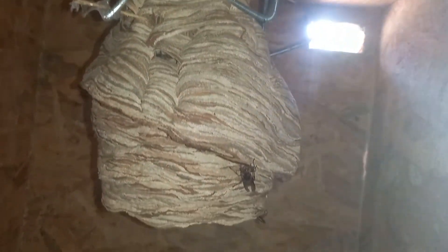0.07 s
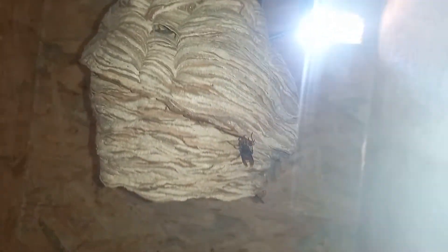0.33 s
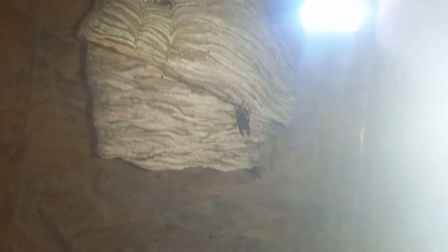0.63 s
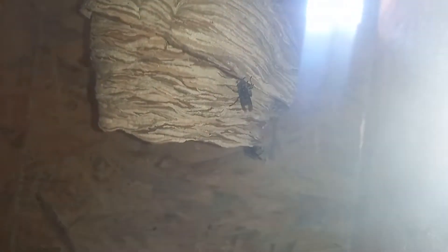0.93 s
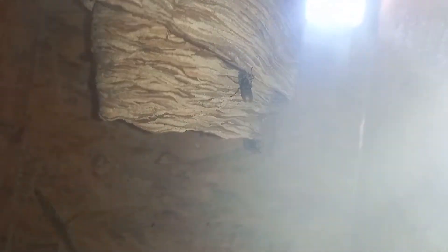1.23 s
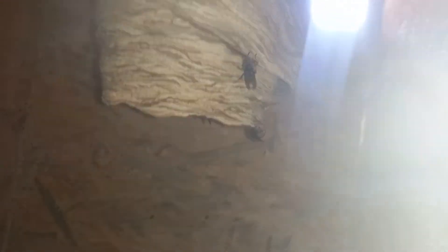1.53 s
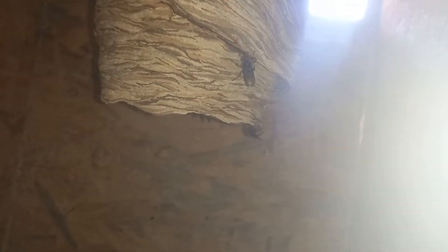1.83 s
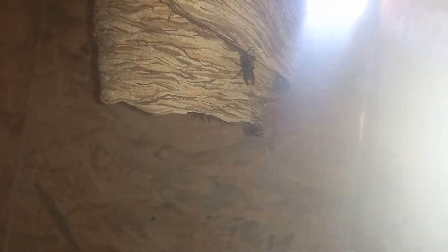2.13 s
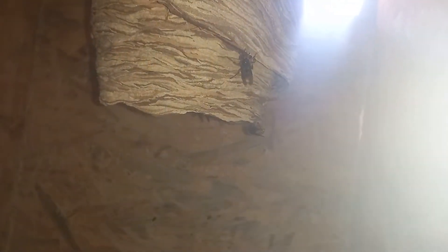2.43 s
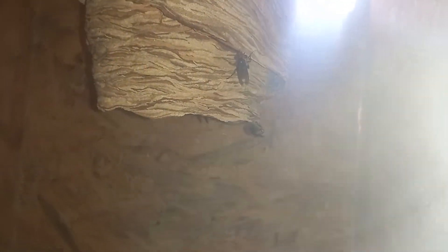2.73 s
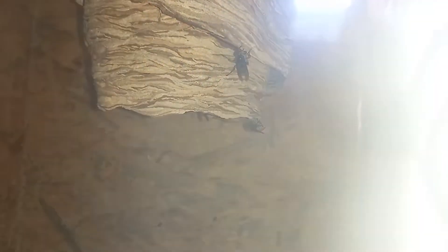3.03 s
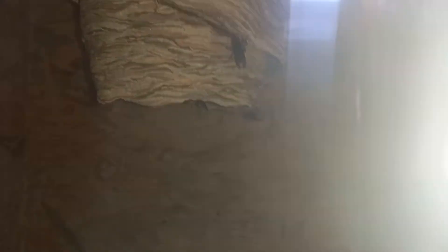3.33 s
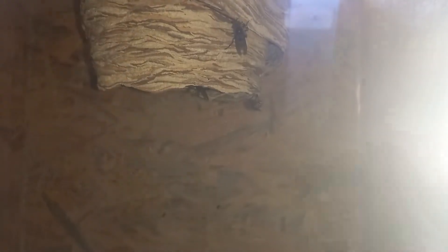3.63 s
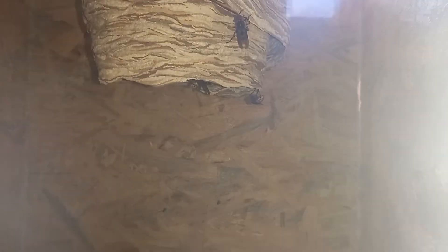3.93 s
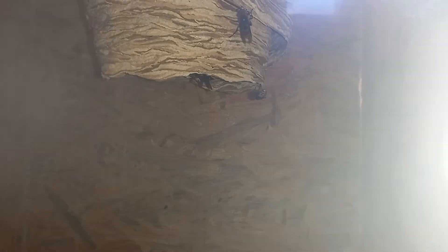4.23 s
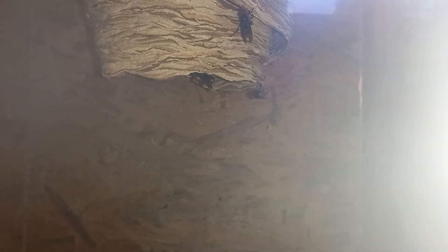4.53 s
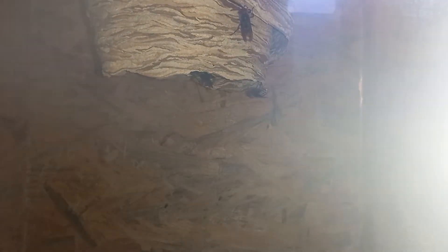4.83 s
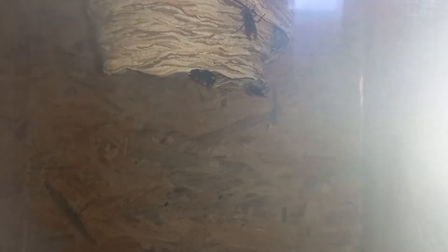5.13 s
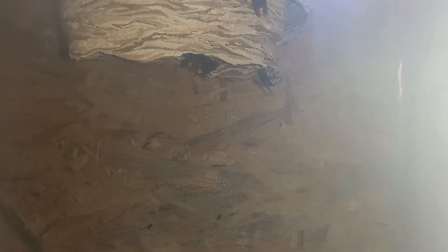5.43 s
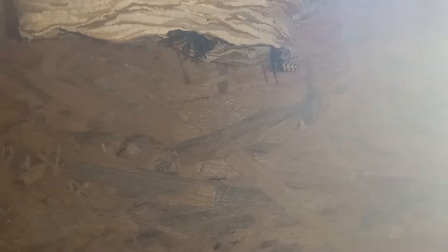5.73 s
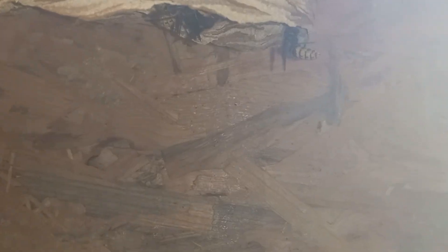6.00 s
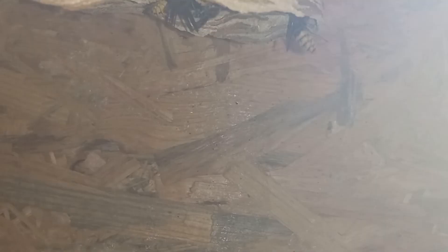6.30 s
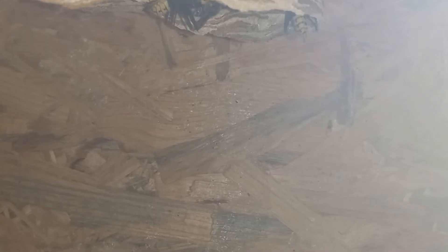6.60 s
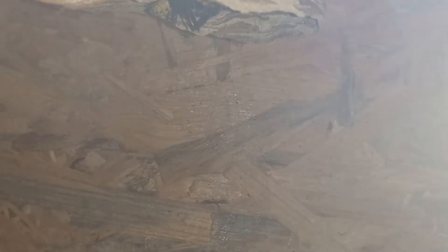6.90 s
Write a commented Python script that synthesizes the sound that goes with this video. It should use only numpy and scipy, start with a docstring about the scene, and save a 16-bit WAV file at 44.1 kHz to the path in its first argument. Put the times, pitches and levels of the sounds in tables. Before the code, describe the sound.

Inside a wooden box, close to a hornets' nest, a quiet low rumble and hum sit under a thin hiss. For the first four seconds or so, the microphone is shifted about, making scratchy rustles, brief rips and a few dull, booming bumps. Then it lies almost still, leaving tiny clicks and faint, papery crackling as a hornet chews the nest.

```python
"""Inside a wooden box, close to a hornets' nest. Dry rubbing and tearing, made of tiny fibre slips,
pass right by two microphone ports in a small casing. The casing bumps the box a few times and both ring.
After about 4 s it lies almost still: jaws tick and rasp faintly on the nest paper,
over a steady low hum, the rumble of the box and a thin hiss."""
import sys
import numpy as np
from scipy import signal
from scipy.fft import rfft, irfft
from scipy.io import wavfile
from scipy.ndimage import uniform_filter1d

SR = 44100
rng = np.random.default_rng(int(sys.argv[2]) if len(sys.argv) > 2 else 0)


def to_wav(sig):
    """Store sig (one row per channel, or 1-D mono) as 16-bit WAV at the path in sys.argv[1].

    Samples outside -1..1 are clipped; the rate is SR.
    """
    pcm = np.clip(np.atleast_2d(sig), -1, 1) * 32767
    pcm = np.round(pcm).astype(np.int16)
    wavfile.write(sys.argv[1], SR, pcm.T)  # frames by channels


N = 306936
TIME_S, BINS_HZ = np.arange(N) / SR, np.fft.rfftfreq(N, 1 / SR)


def amp(db):
    """Decibels to gain."""
    return 10 ** (np.asarray(db) / 20)


def unit(x):
    """Scale to rms 1."""
    return x / np.sqrt(np.mean(x ** 2) + 1e-20)


def curve_at(points, hz):
    """Interpolate on a log-frequency axis."""
    point_hz, value = np.transpose(points)
    return np.interp(np.log(hz + 1), np.log(point_hz + 1), value)


def ports(pan_db):
    """Constant-power stereo gains; pan is left minus right."""
    gains = amp(np.array([[.5], [-.5]]) * pan_db)
    return gains / np.sqrt(np.mean(gains ** 2, 0))


def colour(x, spectrum, tilt_db_oct=0):
    """Apply a spectrum, tilted above 1 kHz; rms 1."""
    hz = np.fft.rfftfreq(x.shape[-1], 1 / SR)
    octaves = np.log2(np.maximum(hz, 1000) / 6000)
    gain = amp(curve_at(spectrum, hz) + tilt_db_oct * octaves)
    return unit(irfft(rfft(x) * gain, x.shape[-1]))


def wander(hz, channels=1):
    """Random drift up to a rate; rms 1."""
    return unit(irfft(rfft(rng.standard_normal((channels, N))) / (1 + (BINS_HZ / hz) ** 4), N))


def add(mix, at_s, sound):
    """Mix in a stereo sound."""
    part = mix[:, max(round(at_s * SR), 0):][:, :sound.shape[1]]
    part += sound[:, :part.shape[1]]


def slips(per_s, spread_db, bed_rms):
    """Tiny slips of uneven size over a bed of finer ones, separate at each port."""
    size = amp(spread_db * np.minimum(rng.exponential(1, (2, N)), 4))
    impulses = size * rng.choice([-1, 1], (2, N)) * (rng.random((2, N)) < per_s / SR)
    return unit(impulses) + bed_rms * rng.standard_normal((2, N))


def swells(peaks_s, rises_s, falls_s, levels_db, pans_db, drop_db=9, flatness=1.82):
    """Stereo envelope of strokes, each drop_db down one rise before and one fall after its peak."""
    power = np.zeros((2, N))
    for peak_s, rise_s, fall_s, db, pan_db in np.broadcast(peaks_s, rises_s, falls_s, levels_db, pans_db):
        t = np.arange(-min(2 * rise_s, peak_s), 2 * fall_s, 1 / SR)
        from_peak = np.maximum(-t / rise_s, t / fall_s)
        gain = amp(db - drop_db * from_peak ** flatness) * ports(pan_db)
        add(power, peak_s + t[0], gain ** 2)
    return np.sqrt(power)


def resonate(x, hz, width_hz):
    """Steep resonance that can slide; rms 1."""
    carrier = np.exp(2j * np.pi * np.cumsum(hz * np.ones(x.shape[1])) / SR)
    pole = np.exp(-np.pi * width_hz / SR)
    baseband = signal.lfilter([1], np.poly([pole, pole]), x / carrier)
    return unit((carrier * baseband).real)


def struck(modes, t, weight_db=0):
    """Decaying modes, peak 1; every blow lands on a slightly different spot."""
    hz, db, t60_s = np.transpose(modes)[:, :, None]
    hz = hz * (1 + .015 * rng.standard_normal(hz.shape))
    sign = (-1) ** np.arange(len(hz))[:, None]
    ring = (sign * amp(db + weight_db - 60 * t / t60_s) * np.sin(2 * np.pi * hz * t)).sum(0)
    return ring / abs(ring).max()


# Fibre friction (frequency [Hz], level [dB])
RUB_SPECTRUM = [(710, -5.5), (1200, -4), (1660, -4.5), (1850, -5.5), (2350, -5), (2730, -3), (4450, -3),
                (6720, -4), (9610, -1.5), (11100, -4), (12200, -2.5), (15200, -6), (16000, -17.5)]
# Rubbing strokes (peak time [s], rise [s], fall [s], hiss level [dB], hiss pan [dB],
# body level [dB], body pan [dB], hiss tilt [dB/oct])
STROKES = [(0.03, 0.12, 0.16, -53.5, 2.5, -70, -3, 1.5), (0.136, 0.073, 0.05, -45.5, -6, -62.5, -16, -1),
           (0.22, 0.026, .11, -44.5, 3.5, -60, 3, 1.5), (0.37, 0.06, 0.18, -51.5, 1.5, -60, 0, -1.5),
           (0.466, 0.026, 0.017, -43.5, 6, -58, 14, 1.5), (0.55, 0.088, 0.15, -50.5, 2, -66, 4, -0.5),
           (0.614, 0.024, 0.066, -47, -9, -41.5, -19, -4), (0.68, 0.065, 0.036, -40.5, 2, -41.5, 1, 0),
           (0.745, 0.069, 0.069, -45, 3, -42.5, 3, -3), (0.853, 0.045, 0.039, -45, 4.5, -51, 10, -1),
           (0.98, 0.092, 0.087, -53.5, 5, -62, 0, -1), (1.063, 0.048, 0.052, -53, 8, -47.5, 5, -1.5),
           (1.2, 0.14, 0.1, -55.5, 2.5, -53.5, 0, 0), (1.37, 0.087, 0.082, -56.5, 8, -57.5, 0, 1),
           (1.438, 0.061, .04, -49.5, 0, -51.5, 1, -2.5), (1.575, 0.053, 0.04, -54, 1.5, -52.5, 2, 1.5),
           (1.628, 0.024, .045, -53, -3.5, -42, -4, -3.5), (1.8, 0.31, 0.1, -70, -3, -70, -1, 4),
           (1.98, 0.066, 0.061, -62, 9, -57, 7, 3), (2.08, 0.044, 0.025, -59.5, 19, -56.5, 21, -1),
           (2.134, 0.029, 0.043, -56, -0.5, -48.5, 3.5, 1.5), (2.275, 0.098, 0.098, -61, 4.5, -53, 9, 0.5),
           (2.465, 0.031, .04, -67, 8, -59.5, 13, 2), (2.53, 0.019, 0.05, -57, 23, -50.5, 24, -1),
           (2.569, .025, 0.034, -58.5, 1, -49.5, 6, -3), (2.705, 0.034, 0.076, -58, -2, -56, 21, -1),
           (2.787, 0.039, 0.033, -52, 2.5, -48, 5, -2.5), (2.889, 0.037, 0.049, -64, 14, -54, 13, 2),
           (3.015, 0.044, 0.052, -53, 19, -52, 6, -2.5), (3.11, 0.12, 0.058, -54.5, 4.5, -54.5, 7, -4),
           (3.27, 0.035, .035, -52, -2, -53.5, 20, -1), (3.335, 0.038, 0.043, -46, -0.5, -48, 20, 0),
           (3.39, .04, 0.027, -52.5, 1.5, -47.5, 9, -2), (3.455, 0.047, 0.036, -56.5, 5, -51, 3.5, -2.5),
           (3.53, 0.052, 0.036, -54.5, -7, -60, -2, -3.5), (3.62, 0.17, 0.092, -69.5, 1, -65.5, 0.5, 4.5),
           (3.76, 0.033, 0.14, -78.5, -1, -71.5, -1, 3), (3.895, 0.047, 0.042, -68.5, 1, -67.5, 0, 0.5),
           (3.945, 0.024, 0.073, -81, 2, -69, -1, 2.5), (4.085, 0.046, 0.048, -61.5, 4.5, -60.5, 13, 1),
           (4.142, 0.03, 0.034, -58.5, -8.5, -68, -5, -0.5), (4.27, 0.11, 0.062, -79.5, 3, -73, 0, 0.5)]


def rubbing(firm_db=-53.5, patch_db=3.07):
    """Dense fibre slips; the contact shifts, so patches of the spectrum come and go."""
    peak_s, rise_s, fall_s, db, pan_db, _, _, tilt_db_oct = np.transpose(STROKES)
    friction = colour(slips(per_s=2500, spread_db=3, bed_rms=1), RUB_SPECTRUM)
    hz, frame_s, frames = signal.stft(friction, SR, nperseg=512)
    patches = uniform_filter1d(rng.standard_normal(frames.shape), size=9, axis=1)
    patches = unit(uniform_filter1d(patches, size=12, axis=2))
    octaves = np.log2(np.maximum(hz, 1000) / 7000)[:, None]
    tilt_db = octaves * np.interp(frame_s, peak_s, tilt_db_oct)
    fizz_band = np.clip((hz[:, None] - 10000) / 3500, 0, 1)
    contact_db = np.clip(0.96 * (db - firm_db), -11, 1)  # light contact loses fizz
    fizz_db = fizz_band * np.interp(frame_s, peak_s, contact_db)
    frames = frames * amp(patch_db * patches + tilt_db + fizz_db)
    friction = unit(signal.istft(frames, SR, nperseg=512)[1][:, :N])
    flutter_db = 1.4 * wander(hz=49.4, channels=2)
    return friction * swells(peak_s, rise_s, fall_s, db, pan_db) * amp(flutter_db)


# Friction through the casing (frequency [Hz], level [dB])
DRAG_SPECTRUM = [(53, -26), (90, -3.5), (145, 0), (174, -13), (231, -2.5), (274, -7), (530, -6.5),
                 (1340, -18), (1500, -21), (1750, -23.5), (2600, -38), (3380, -54.5), (5720, -120)]


def dragging():
    """Coarser slips of the same strokes sound through the casing."""
    peak_s, rise_s, fall_s, _, _, db, pan_db, _ = np.transpose(STROKES)
    body = colour(slips(per_s=1200, spread_db=1.5, bed_rms=0.85), DRAG_SPECTRUM)
    flutter_db = 1.5 * wander(hz=30, channels=2)
    return body * swells(peak_s, rise_s, fall_s, db, pan_db) * amp(flutter_db)


# Box and casing modes (frequency [Hz], level [dB], t60 [s])
BOX_MODES = [(70, 1, .13), (138, 0, .15), (232, -4, .1), (322, -6, .08), (410, -5, .07), (510, -6, .05),
             (650, -10, .04), (900, -8, .04)]
CASING_MODES = [(498, 9, 0.031), (946, 3, 0.017), (2090, 2.5, 0.0028), (4000, -12.5, .003)]
# Blows on the box (time [s], boom level [dB], centre [Hz], pan [dB], crack level [dB])
BUMPS = [(0.674, -17, 337, 10, -34), (0.6889, -16.5, 113, 11, -32), (1.146, -37.5, 170, 16, -40),
         (1.390, -25.5, 217, 11, -25), (1.4018, -26.5, 106, 2.5, -50), (1.442, -35, 169, 2, -39.5),
         (1.597, -21, 237, 8, -20.5), (1.6092, -24.5, 103, 5.5, -49), (2.523, -47, 171, 6, -33.5),
         (2.602, -45, 500, 6, -43.5), (2.678, -30.5, 290, 28, -43), (3.4397, -27, 262, 10, -34),
         (3.444, -23.5, 138, 3, -55), (3.921, -38.5, 318, 7, -68), (4.1432, -36.5, 250, 31, -40.5),
         (4.169, -33, 86.8, -3.5, -70.5), (6.103, -46, 289, -10, -72)]


def bumps(right_lag_s=.001, focus_db=4.5):
    """The casing cracks and the box booms around the blow's centre frequency, later on the right."""
    out, t = np.zeros((2, N)), np.arange(SR // 3) / SR
    for at_s, boom_db, centre_hz, pan_db, crack_db in BUMPS:
        octaves = np.log2(np.array(BOX_MODES)[:, :1] / centre_hz)
        for port, arrival_s in zip(np.eye(2), (at_s, at_s + right_lag_s)):
            boom = amp(boom_db) * struck(BOX_MODES, t, -focus_db * octaves ** 2)
            crack = amp(crack_db) * struck(CASING_MODES, t)
            add(out, arrival_s, (boom + crack) * ports(pan_db) * port[:, None])
    return out


# Short tears (time [s], level [dB], t60 [s], pan [dB], tilt [dB/oct])
TEARS = [(0.181, -32.5, 0.062, 5, 0.5), (0.1908, -35, 0.084, 8, -1), (0.2213, -35, 0.036, -2, -3.5),
         (0.251, -38.5, 0.07, -8, -0.5), (0.4233, -33.5, 0.031, -6, 4), (0.6778, -30, 0.034, 6, -2),
         (0.7594, -35.5, 0.061, -1, -2.5), (0.8238, -33.5, 0.031, 11, -2), (1.419, -42.5, .05, 0, -5.5),
         (1.598, -30.5, 0.021, 3, -9.5), (1.715, -57.5, 0.06, -9, 0.5), (2.5236, -61, 0.07, 20, -4),
         (3.235, -56.5, 0.062, 11, -5), (3.3158, -34.5, 0.058, -10, -2), (3.5197, -43, 0.081, -19, -6)]


def tears(attack_s=0.00041):
    """A catch lets go in a burst of slips that dies quickly."""
    out, t = np.zeros((2, N)), np.arange(SR // 6) / SR
    for at_s, db, t60_s, pan_db, tilt_db_oct in TEARS:
        burst = colour(rng.standard_normal((2, len(t))), RUB_SPECTRUM, tilt_db_oct)
        envelope = (1 - np.exp(-t / attack_s)) * amp(db - 60 * t / t60_s)
        add(out, at_s, burst * envelope * ports(pan_db))
    return out


# Stick-slip strokes (peak time [s], rise [s], fall [s], level [dB], resonance [Hz])
CHAFES = [(0.31, 0.052, 0.12, -54, 1300), (0.47, 0.12, 0.083, -56, 1160),
          (0.592, 0.0081, 0.026, -37.5, 1020), (0.667, 0.038, 0.034, -40.5, 1150),
          (0.87, .04, 0.048, -55.5, 930)]


def chafing():
    """Slips ring one sliding resonance, mostly on the right."""
    peak_s, rise_s, fall_s, db, hz = np.transpose(CHAFES)
    friction = slips(per_s=600, spread_db=6.5, bed_rms=0.97)
    ring = resonate(friction, np.interp(TIME_S, peak_s, hz), width_hz=570)
    return ring * swells(peak_s, rise_s, fall_s, db, pans_db=-27)


# Squeaks and groans (time [s], length [s], level [dB], resonance [Hz], width [Hz], pan [dB])
SQUEAKS = [(2.045, 0.41, -69.5, 4550, 1500, 19), (2.435, 0.085, -69, 1400, 300, -13),
           (2.52, 0.12, -59.5, 1510, 700, 4), (2.521, 0.085, -68, 5100, 600, 4),
           (2.676, 0.17, -65.5, 5000, 600, -18), (2.736, 0.061, -57.5, 1510, 200, -22),
           (3.314, 0.02, -45, 2240, 300, -14), (3.316, .11, -54, 1320, 900, -4),
           (3.512, 0.04, -53.5, 1360, 500, -17), (4.146, .06, -52.5, 324, 300, -1),
           (4.457, 0.19, -84, 9500, 2000, 17), (5.018, 0.11, -84, 2130, 150, -6),
           (5.028, .1, -82, 5730, 400, -12), (6.085, .12, -64, 330, 45.5, -6),
           (6.089, .13, -64.5, 470, 200, -6), (6.096, .05, -80, 14100, 2000, -3),
           (6.109, 0.27, -83, 7600, 2200, -18)]


def squeaks():
    """Friction briefly locks onto one resonance, then lets go."""
    out = np.zeros((2, N))
    for at_s, length_s, db, hz, width_hz, pan_db in SQUEAKS:
        progress = np.linspace(0, 1, round(length_s * SR))
        grip = np.minimum(progress / 0.12, 1) * (1 - progress ** 2)
        ring = resonate(rng.standard_normal((2, len(progress))), hz, width_hz)
        add(out, at_s, ring * grip * amp(db) * ports(pan_db))
    return out


# Fibre snap (frequency [Hz], level [dB])
TICK_SPECTRUM = [(800, -0.5), (2500, -2), (5000, -3), (9000, 3), (12000, -3.5), (15500, 1.5)]
# Jaw ticks (time [s], level [dB], pan [dB])
JAW_TICKS = [(0.421, -50, 13), (0.4823, -36.5, -11), (0.7205, -27.5, 10), (3.2152, -54, 3),
             (3.8267, -55, 1), (4.0112, -51.5, 4.5), (4.343, -51, 6), (4.373, -66, 10), (4.4394, -65, 1),
             (4.5205, -65, 10), (4.6815, -63, 3), (5.2594, -73, 3.0), (6.8796, -63, 1)]


def jaw_ticks(width_s=0.0012, tail_s=.007, tail_db=-25.5):
    """Jaws snap single fibres: a bright click with a slight tail."""
    out, t = np.zeros((2, N)), np.arange(SR // 20) / SR
    envelope = np.exp(-((t - .001) / width_s) ** 2) + amp(tail_db) * np.exp(-t / tail_s)
    for at_s, db, pan_db in JAW_TICKS:
        snap = colour(rng.standard_normal((2, len(t))), TICK_SPECTRUM)
        add(out, at_s, snap * envelope * amp(db) * ports(pan_db))
    return out


# Nest paper (frequency [Hz], level [dB])
PAPER_SPECTRUM = [(350, -22), (600, -6.5), (661, -0.5), (727, -6.5), (1160, -12), (1660, -12), (1930, -26),
                  (2120, -18), (2540, -18), (5190, -22), (9490, -17), (16000, -24)]
# Jaw strokes (peak time [s], rise [s], fall [s], level [dB], pan [dB])
JAW_RASPS = [(4.365, 0.021, 0.035, -74, 0), (4.48, 0.034, 0.028, -75, 1), (4.56, 0.047, 0.068, -73.5, 1),
             (4.71, 0.022, 0.094, -75.5, 0), (4.87, .08, 0.19, -81.5, 2), (5.029, 0.049, 0.056, -73.5, 3),
             (5.25, 0.12, 0.063, -78, 4), (5.361, .04, 0.058, -81.5, -1),
             (6.119, 0.052, 0.067, -77.5, -1.5), (6.26, 0.097, 0.1, -79, 0), (6.44, .03, 0.038, -82.5, 8),
             (6.6, 0.076, 0.069, -80.5, 9), (6.74, 0.081, .06, -79, 5), (6.87, 0.12, .1, -75, 3)]


def jaw_rasps():
    """Nest paper crackles faintly as jaws work it."""
    crackle = colour(slips(per_s=380, spread_db=4, bed_rms=1), PAPER_SPECTRUM)
    return crackle * swells(*np.transpose(JAW_RASPS))


# Likeness of the air at the two ports (frequency [Hz], correlation [-1..1])
AIR_CORRELATION = [(60, 0.55), (150, 0.89), (380, 0.82), (950, -0.72), (2380, -0.15), (5980, -0.16),
                   (15000, -0.93)]
# Air balance (frequency [Hz], pan [dB])
AIR_PAN = [(60, 1), (150, 0), (380, 2), (950, 2.0), (2380, 0.069), (5980, 0.5), (15000, -1.5)]
# Box rumble and thin hiss (frequency [Hz], level [dB])
RUMBLE_SPECTRUM = [(15, -39), (25, -13.5), (59, 3.5), (146, -0.5), (167, -10.5), (199, -5.5), (224, -10.5),
                   (332, -18), (408, -18), (519, -20.5), (595, -30), (659, -23.5), (718, -25), (1500, -45),
                   (1950, -70), (3300, -120)]
HISS_SPECTRUM = [(590, -23), (1000, -13), (1430, -19.5), (1850, -9.5), (2440, -12.5), (2530, -11.5),
                 (4790, -19), (13600, -20), (16000, -15)]
# Deepest rumble, stronger while the casing moves (time [s], gain [dB])
DEEP_GAIN = [(0, -5.5), (1.0, 5), (1.85, -1), (2.9, 4.5), (4.3, -0.5), (5.5, -2), (6.96, -5.5)]


def box_air(rumble_db=-60, hiss_db=-82.5, deep_hz=130, right_lag_s=.00035):
    """Low rumble swells and sinks in the box, alike at both ports, under a thin steady hiss."""
    left, independent = rfft(rng.standard_normal((2, N)))
    correlation = np.clip(curve_at(AIR_CORRELATION, BINS_HZ), -1, 1)
    lag = np.exp(-2j * np.pi * BINS_HZ * right_lag_s)  # the right port lies farther in
    right = lag * (correlation * left + np.sqrt(1 - correlation ** 2) * independent)
    noise = irfft(np.array([left, right]) * ports(curve_at(AIR_PAN, BINS_HZ)), N)
    rumble = colour(noise, RUMBLE_SPECTRUM)
    deep = signal.sosfiltfilt(signal.butter(2, deep_hz, fs=SR, output="sos"), rumble)
    deep_db = np.interp(TIME_S, *np.transpose(DEEP_GAIN)) + 2 * wander(hz=4)
    rumble = rumble + deep * (amp(deep_db) - 1)
    hiss = colour(noise, HISS_SPECTRUM) * amp(hiss_db)
    return rumble * amp(rumble_db + 0.44 * wander(hz=7.8)) + hiss


# Hum overtones (harmonic number, relative level [dB])
HUM_HARMONICS = [(2, -6), (3, 1), (4, -1.5), (5, -12.5), (6, -16.5), (8, -17), (10, -16.5), (11, -16.5),
                 (13, -22), (14, -19)]


def hum(pitch_hz=48.68, level_db=-69, pan_db=-4, drift=.002, waver_db=2):
    """Perhaps a distant motor: overtones of a nearly steady pitch, each wavering in level."""
    phase = 2 * np.pi * np.cumsum(pitch_hz * (1 + drift * wander(hz=2.86)[0])) / SR
    tones = 0
    for harmonic, db in HUM_HARMONICS:
        gain = amp(db + waver_db * wander(hz=6.2))
        tones += gain * np.sin(harmonic * phase + 2 * np.pi * rng.random())
    return unit(tones) * amp(level_db) * ports(pan_db)


def scene():
    """All sources at the two ports."""
    friction = rubbing() + dragging() + chafing() + squeaks()
    return friction + bumps() + tears() + jaw_ticks() + jaw_rasps() + box_air() + hum()


def record(dry):
    """Band limit, 44 Hz to 16 kHz."""
    highpassed = signal.sosfilt(signal.butter(4, 44, "high", fs=SR, output="sos"), dry)
    lowpass = signal.firwin(511, 16000, window=("kaiser", 8), fs=SR)
    return signal.oaconvolve(highpassed, lowpass[None], "same")


dry = scene()
out = record(dry)
to_wav(out)
```